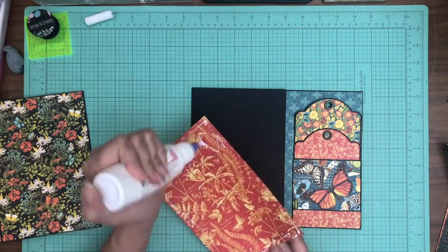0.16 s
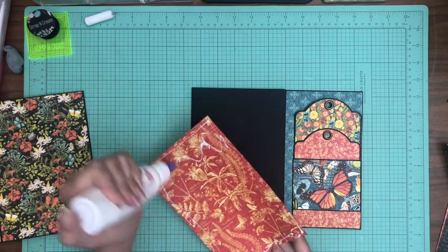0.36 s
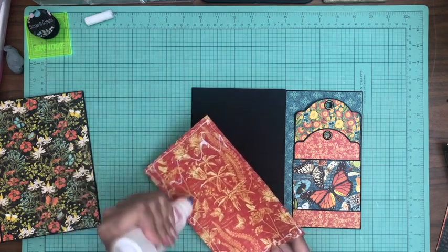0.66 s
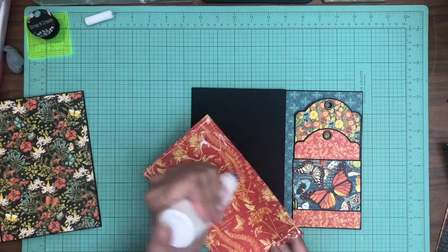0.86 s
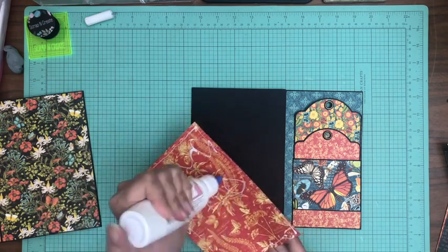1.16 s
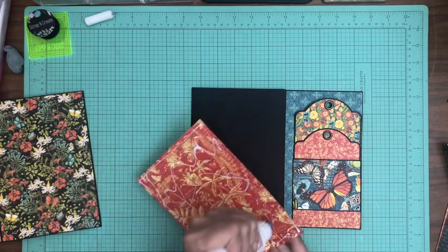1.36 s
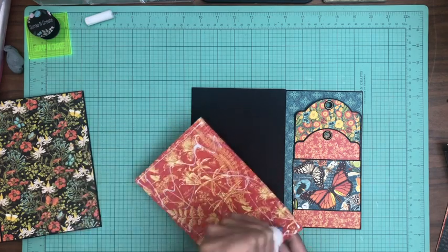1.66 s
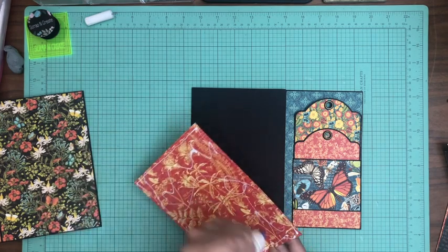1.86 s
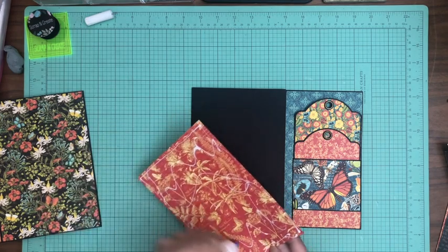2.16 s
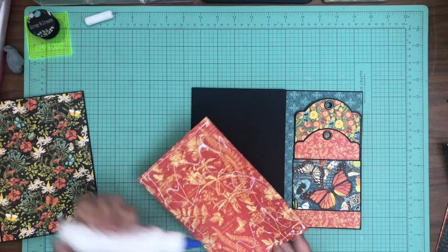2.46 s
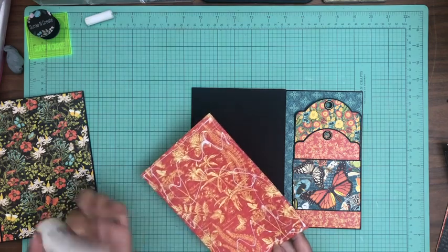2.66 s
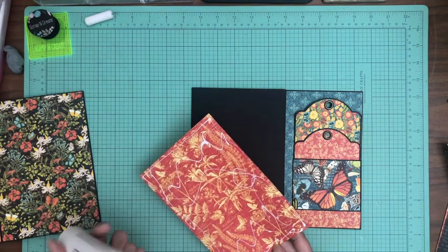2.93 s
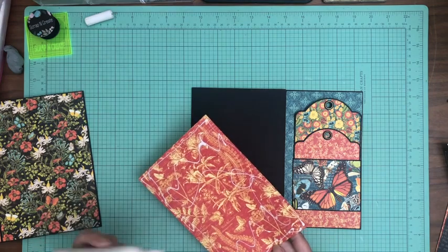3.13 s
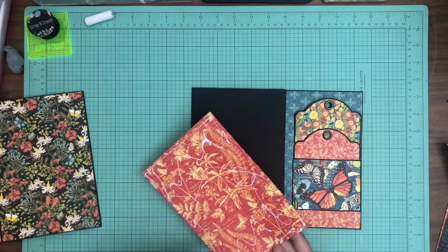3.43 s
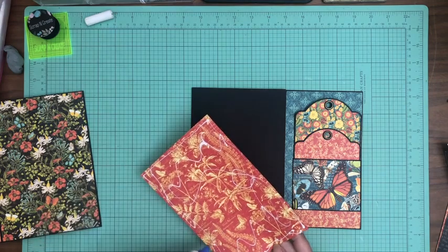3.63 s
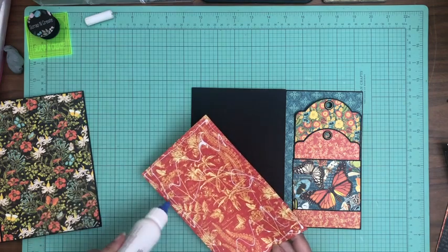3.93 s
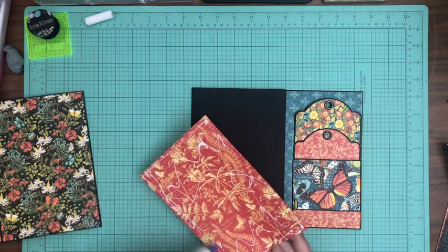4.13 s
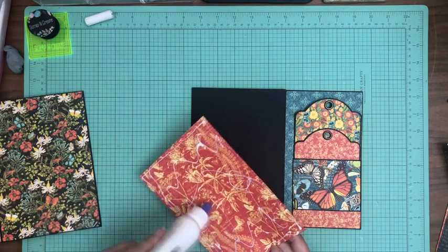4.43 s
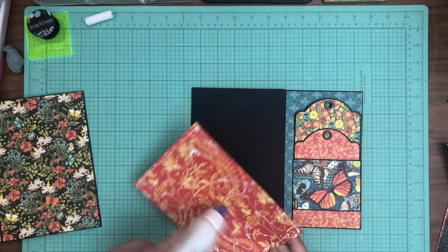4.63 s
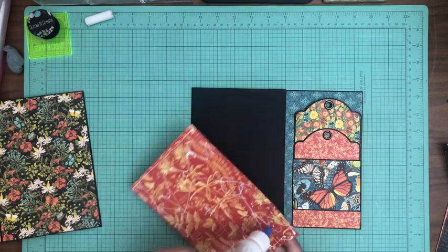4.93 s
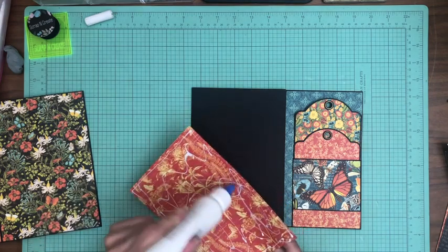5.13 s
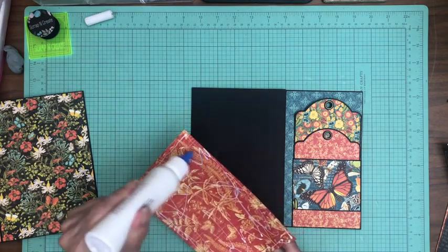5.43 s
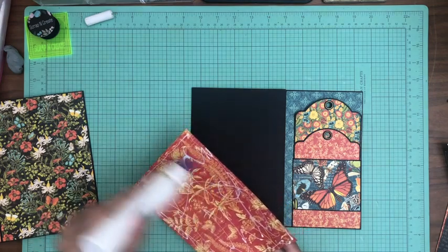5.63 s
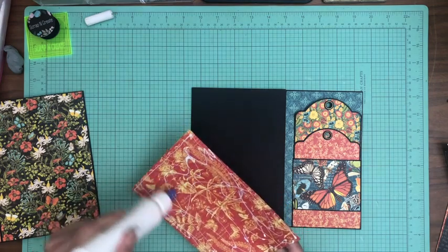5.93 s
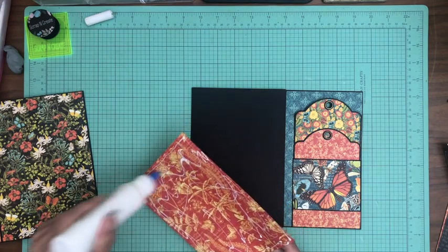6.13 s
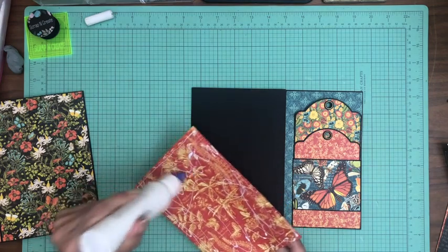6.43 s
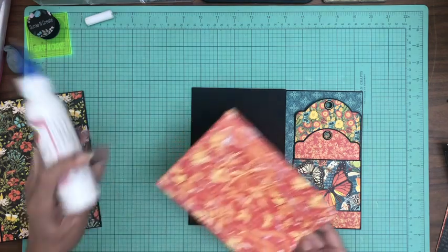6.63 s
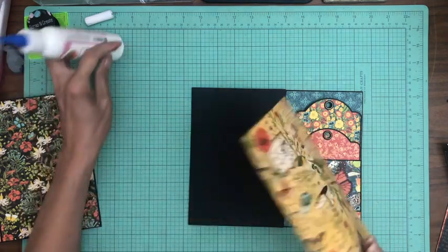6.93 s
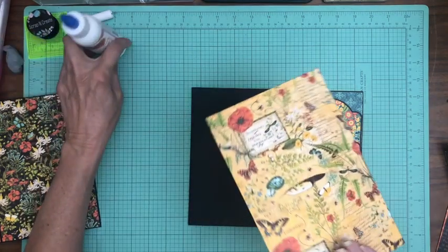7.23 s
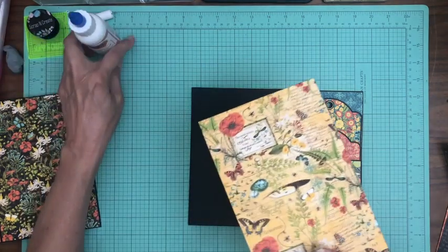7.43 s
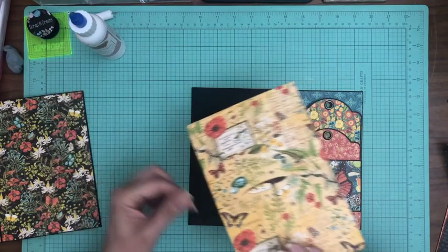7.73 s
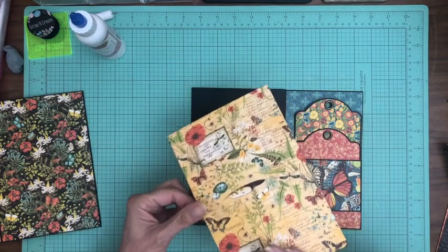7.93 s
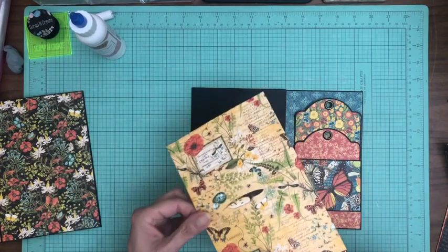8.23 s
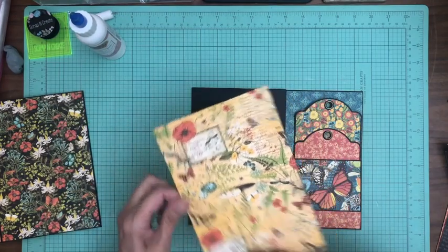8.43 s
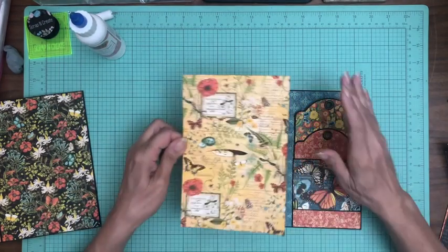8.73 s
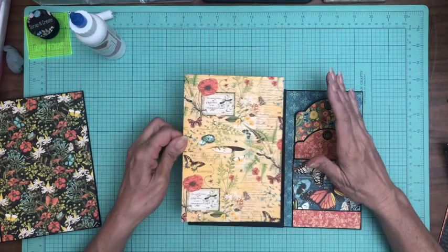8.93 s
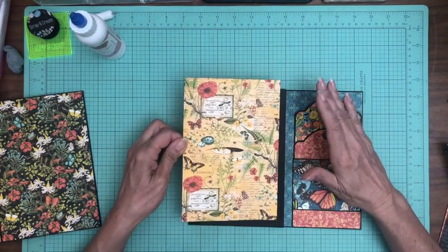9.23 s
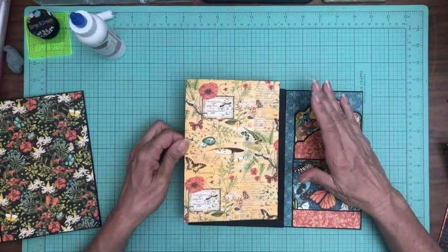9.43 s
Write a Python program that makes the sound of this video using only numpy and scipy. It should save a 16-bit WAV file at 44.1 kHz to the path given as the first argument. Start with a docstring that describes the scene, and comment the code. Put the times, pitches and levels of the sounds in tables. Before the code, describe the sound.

A plastic glue nozzle scribbles in quick raspy strokes over stiff paper, pauses, resumes, then a bottle thumps on the table and paper rustles.

```python
"""A plastic glue bottle nozzle scribbles back and forth over hand-held cardstock: noise bursts, one a stroke,
coloured by nozzle and sheet. The sheet pops (dying low modes); fibres and edges tick (short noise bursts).
The strokes pause for faint rustles, then resume. The bottle is then stood on the table with a thump (click,
table modes, rattle) and the sheet is turned over in the fingers, rustling and popping.
Throughout: a quiet room with a low appliance hum and thin whines, heard by a microphone overhead."""
import sys
import numpy as np
from scipy import signal
from scipy.fft import rfft, irfft
from scipy.io import wavfile
from scipy.ndimage import uniform_filter1d

SR = 44100
rng = np.random.default_rng(int(sys.argv[2]) if len(sys.argv) > 2 else 0)


def wav_out(sig):
    """Save sig, one row per channel (or a flat mono array), as 16-bit PCM at SR to the path in sys.argv[1]."""
    wavfile.write(sys.argv[1], SR, np.round(np.clip(np.atleast_2d(sig).T, -1, 1) * 32767).astype(np.int16))


N = 422478


def amp(db):
    """Decibels to gain."""
    return 10 ** (np.asarray(db) / 20)


def evened(x):
    """Scales to rms 1."""
    return x / np.sqrt(np.mean(np.abs(x) ** 2) + 1e-20)


def smoothed(x, first, second, axis=-1):
    """Two running means in a row."""
    return uniform_filter1d(uniform_filter1d(x, first, axis=axis), second, axis=axis)


def read(points, hz):
    """Looks up a spectrum on a log-frequency axis."""
    f, value = np.transpose(points)
    return np.interp(np.log(hz + 1), np.log(f + 1), value)


def along(curve, s, column=1):
    """Looks up a curve in time."""
    return np.interp(s, *np.transpose(curve)[[0, column]])


def peak(hz, centre_hz, width_hz):
    """Gain of one resonance, 1 at the top."""
    return 1 / np.sqrt(1 + (2 * (hz - centre_hz) / width_hz) ** 2)


def blend(*parts):
    """Power sum of (level dB, spectrum) parts, each spectrum first scaled to rms 1."""
    return np.sqrt(sum((amp(db) * evened(spectrum)) ** 2 for db, spectrum in parts))


def add(mix, s, sound):
    """Mixes a sound in from time s on."""
    at = round(s * SR)
    sound = sound[max(-at, 0):]
    part = mix[max(at, 0):][:len(sound)]
    part += sound[:len(part)]


def ring(hz, t60_s, seconds, rise_ms):
    """One dying mode with a soft start."""
    t = np.arange(round(seconds * SR)) / SR
    return amp(-60 * t / t60_s) * np.sin(2 * np.pi * hz * t) * (1 - np.exp(-1000 * t / rise_ms))


# Nozzle strokes. Each row: top speed at in seconds, rise in ms, fall in ms, sheet ring reference level in dB,
# brightness (hiss above the ring reference) in dB, sheet ring in Hz, nozzle ring in Hz.
STROKE_ROWS = [(0.031, 24, 31, -32, -8.5, 1470, 6050), (0.102, 16.4, 51, -35, -1, 1650, 4140),
               (0.221, 29.0, 32, -33, -6.5, 1310, 4170), (0.299, 26, 42, -32.5, -3.7, 1350.0, 4100),
               (0.347, 16, 48, -35.5, -5.5, 1490, 4300), (0.39, 4.9, 52.7, -32, -7, 1640, 4500),
               (0.472, 5.8, 123, -38, -7, 1550, 3260), (0.593, 19, 62.5, -30, -0.8, 1660, 4010.0),
               (0.738, 66, 28, -31, -8.5, 1460.0, 5750), (0.827, 53, 30, -31.5, -5.4, 1290, 4330),
               (0.84, 97.2, 115, -33.5, -16.5, 1270, 4260.0), (1.011, 25, 34.6, -32.5, -14, 1300, 6700),
               (1.087, 53, 43, -26, -17.5, 1340, 2900), (1.143, 39, 27, -32.0, -10.5, 1310.0, 4690.0),
               (1.238, 22, 104, -26, -8, 1430.0, 6650.0), (1.304, 70, 57, -32, 1.2, 1640, 6830.0),
               (1.433, 20, 49, -30.5, -1.0, 1370, 4400), (1.49, 42, 29.4, -28, -0.5, 1450.0, 4400.0),
               (1.58, 5.6, 41, -33, -2, 1500, 6100), (1.653, 69, 26.1, -30, 2.5, 1340, 6800),
               (1.719, 60, 34, -36.5, 0, 1380.0, 4970.0), (1.741, 20, 44, -26, -10.5, 1420, 4900),
               (1.826, 12, 24, -31.5, -12, 1280, 5650), (1.849, 15, 13, -31.5, 0, 1320, 5740),
               (1.94, 8, 63, -29.5, -7, 1400, 5400), (2.037, 7.6, 15.7, -31.5, -12, 1540, 3550.0),
               (2.076, 3.3, 36, -29, -12.5, 1400, 2860.0), (2.161, 28, 46, -30.0, -7, 1800, 3020),
               (2.252, 21, 12.7, -29.8, -18.5, 1470.0, 2710.0), (2.277, 22.4, 47, -29.5, -10, 1530, 3420),
               (2.357, 19, 39, -35.5, 6, 1650, 3170), (2.397, 36, 12, -29.5, -1, 1710, 3100),
               (2.417, 7.1, 57, -50, 5, 1660, 6400.0), (2.484, 6.3, 7.3, -48, -2, 2150.0, 2710.0),
               (2.558, 88.5, 14, -56, 3.5, 1540, 4840.0), (3.617, 6.4, 160, -50.5, -8.5, 1410.0, 5730),
               (3.793, 57, 23, -38, -12, 1480.0, 3330), (3.827, 3.8, 15, -33, -16, 1720, 2780),
               (3.866, 5.4, 65, -36.2, -12.5, 1610.0, 2820.0), (3.984, 5.8, 59, -44, -4.5, 1670.0, 2840.0),
               (4.015, 14, 8.4, -30.5, -4, 1650, 2910.0), (4.11, 2.0, 30, -48, -8, 1590.0, 2710.0),
               (4.179, 21, 57, -24.5, -8.1, 1860, 2750), (4.211, 3.8, 51, -41.5, -12.8, 1890.0, 2860.0),
               (4.27, 6.3, 65, -27.5, -13, 1970, 2980), (4.311, 31, 35, -28, -1, 2020, 6600),
               (4.386, 8.6, 66, -24, -14.5, 1550.0, 2870), (4.47, 5.0, 34, -35, -5, 1400.0, 4300.0),
               (4.487, 8, 8.5, -32, 4, 1420.0, 4240.0), (4.578, 11.4, 51, -29, -7, 1480, 4000),
               (4.61, 27, 22, -25.5, -8.5, 1430, 4060), (4.76, 3.6, 12.4, -23.0, -5.0, 1220, 3260.0),
               (4.793, 14.6, 11.5, -23.0, -8.5, 1140, 5900.0), (4.8, 29, 67, -35, -4, 1200.0, 5970),
               (4.873, 3.6, 7.3, -37, 17.5, 1490.0, 5740), (4.904, 5.0, 15.0, -44, 14, 1800.0, 7000.0),
               (4.931, 37, 14.4, -30.5, 5.5, 1820.0, 7000), (5.006, 33.0, 28, -33.5, 10, 1580, 5700),
               (5.05, 58, 26, -30.5, -10, 1290, 7750.0), (5.136, 37, 19, -37.5, -3.5, 1310, 5070),
               (5.205, 19, 68.5, -36, -4.5, 1670.0, 5470.0), (5.326, 5.5, 26, -38.5, -26, 1290, 7320.0),
               (5.43, 11, 20.4, -37.5, -12, 1250.0, 2800), (5.495, 12.3, 27, -32, -9, 1270, 5020.0),
               (5.517, 12.0, 40, -34, 7, 1470.0, 5060), (5.593, 11, 3.7, -32, -3.5, 1460, 5660.0),
               (5.63, 24.5, 35.4, -29.5, 1, 1390, 5370), (5.702, 24, 13, -37, -12, 1230, 3190.0),
               (5.74, 7.6, 18.4, -33, 7.5, 1900.0, 3200), (5.803, 30.4, 29, -33.5, 1.6, 1380, 8500),
               (5.837, 10.4, 41, -35.5, 6, 1410.0, 3920.0), (5.924, 26, 21, -35.2, 5, 1870.0, 6650),
               (5.95, 38, 32.6, -30.2, -8.5, 1920.0, 6700), (6.043, 25.5, 7.1, -27.5, -1.2, 1520, 4850),
               (6.077, 27, 28, -35, 3.5, 1840, 4830), (6.173, 36, 43, -31.5, 5, 1700, 7800),
               (6.264, 19, 5.1, -32.5, 4.7, 1360.0, 5920.0), (6.28, 8.5, 22, -34.5, -2.5, 1290, 5960.0),
               (6.359, 24.5, 10.7, -31, 3, 1320, 7600), (6.396, 14.3, 18.2, -25.0, -6.0, 1190, 3830.0),
               (6.436, 12, 49, -37, 0, 1360.0, 7400), (6.456, 4, 23, -38.5, 11.5, 1540.0, 7470.0)]


def stroke(row):
    """One nozzle stroke: fine grit, hard snags, pitch sinking at low speed."""
    return rub(row, grit_db=1.0, bumpy_db=0.73, ring_width_hz=700, ripple_db=3.06,
               modes_db=-1, sag=.18, snag=5.7)


# Fingers and cloth brushing paper and bottle. Each row: as for the nozzle strokes.
RUSTLE_ROWS = [(2.689, 2.0, 130, -70, 13.5, 1310.0, 6420.0), (2.696, 6, 8, -69, 15, 1300, 6400),
               (2.902, 12.9, 13, -53, 7.5, 1930.0, 5170.0), (3.034, 79, 31.1, -60.5, 3.7, 1440.0, 3980.0),
               (3.177, 73, 24.5, -57.1, -2, 1390.0, 6140.0), (6.587, 95, 36, -49.3, 1, 1610.0, 4200.0),
               (6.704, 77, 27, -53.5, 6.5, 1600.0, 7100), (6.797, 56, 66, -54, 6.5, 1870, 6330.0),
               (6.872, 2.5, 40, -56.5, 6.5, 1900, 3900), (7.256, 28.1, 89, -58, -2, 1280.0, 7060.0),
               (7.327, 9.4, 4.0, -60, 4, 1320.0, 7840.0), (7.681, 20, 19.4, -45.5, -28, 2100, 2710.0),
               (7.733, 6.6, 31, -49.5, -12, 1710.0, 3950), (7.942, 48, 13, -46, -10, 1530, 3510.0),
               (7.974, 2.0, 26, -56, -4, 1330.0, 4480.0), (8.144, 61, 42.6, -51.5, 1.5, 1530, 5810.0),
               (8.249, 18, 28, -42, -4.5, 1700, 6200), (8.312, 27, 23, -38, -4.5, 1650, 6100),
               (8.412, 4.9, 19, -39.5, -3, 1510, 6200), (8.42, 68, 51, -43.5, -0.5, 1510, 6100),
               (8.438, 11, 6.6, -34, -2, 1580, 6100), (8.559, 11, 7.9, -49.5, -9, 1750, 5300),
               (8.799, 2.4, 50, -53, -2.5, 1240.0, 7450.0)]


def rustle(row):
    """One brush of fingers or cloth: coarser grit, weaker snags, hardly any sinking."""
    return rub(row, grit_db=3.5, bumpy_db=1.5, ring_width_hz=700, ripple_db=0.1,
               modes_db=-6, sag=0.0292, snag=1.4)


# Spectrum shapes of slow waves in the sheet, scratch, hiss, fizz. Each row: Hz, relative level in dB per Hz.
BENDING_SHAPE = [(90, -41), (250, -10.5), (500, 4), (800, 2.5), (1100, -1), (2000, -27)]
SCRATCH_SHAPE = [(1500, -35.5), (2400, 2), (3500, 3.5), (5500, -1.5), (8000, -18)]
HISS_SHAPE = [(3500, -14.5), (5500, 2), (7000, 2), (10000, -1.5), (13000, -23)]
FIZZ_SHAPE = [(8000, -35), (10500, 0.5), (13000, 1), (16000, -3.5), (17000, -40)]
# Modes of the held sheet. Each row: centre in Hz, width in Hz, relative level in dB.
SHEET_MODES = [(1250, 200, 1), (1650, 350, -5), (2050, 400, -7)]
# Bending waves under a loud stroke, as the grip tightens and slackens. Each row: time in seconds, level in dB.
GRIP_SLACK = [(0, -44.5), (.6, -46), (.8, -40), (1.4, -51), (1.75, -51), (2.1, -47), (2.6, -48), (3.8, -44),
              (4.6, -48), (4.79, -32.5), (4.87, -58), (5.1, -43), (5.4, -36), (5.75, -44.5), (6.3, -36),
              (6.45, -45), (6.6, -46.5), (7.3, -54), (7.75, -54), (7.9, -35.5), (8.2, -42.5), (8.8, -40)]
# Drifting colour of the rubbing. Each row: time in seconds, scratch above its share in dB, fizz above hiss in dB.
RUB_COLOUR = [(0, -1, -8), (.2, 4.5, -11), (.6, 1.5, -10), (1, -3.5, -12), (1.4, -2, -8.5),
              (2.2, 2.5, -9.5), (2.5, -1.5, -2.5), (2.9, -4, 2), (3.2, 0, -9), (4.2, 5, -7), (4.5, -2, -10),
              (4.9, -3, -5), (5.3, -0.5, -8), (5.5, 0.5, -8.5), (5.9, 2.5, -11), (6.3, -1, -11),
              (6.9, -1, -7), (7.3, -3, -8), (7.7, 12, -20), (7.97, 1, -2), (8.15, -3.5, -13), (8.8, 1, -15)]
BENDING_SHARE, LOUD_DB = .4, -30  # bending follows the ring level by this share, counted from LOUD_DB
SCRATCH_SHARE = 0.75  # scratch follows the brightness by this share
RING_POWER, SCRATCH_POWER = 0.74, 0.81  # gain = speed to this power: sheet rings at speeds too low to hiss
SNAGS_PER_S = 450


def slip_noise(size, grit_db, snag):
    """Two trains of fibre slips, for contact and body; hard snags of fibres join the first."""
    grit = amp(grit_db * np.minimum(rng.exponential(1, size), 3))
    slips = evened(rng.standard_normal((2, size)) * grit)
    snags = snag * np.sign(slips[0]) * (rng.random(size) < SNAGS_PER_S / SR)
    return np.array([evened(slips[0] + snags), slips[1]])


def rub(row, grit_db, bumpy_db, ring_width_hz, ripple_db, modes_db, sag, snag):
    """One sweep: a dense train of fibre slips, swelling with speed, heard through the sheet."""
    s, rise_ms, fall_ms, ring_db, bright_db, ring_hz, nozzle_hz = row
    hiss_db = ring_db + bright_db
    scratch_db = ring_db + SCRATCH_SHARE * bright_db + along(RUB_COLOUR, s)
    fizz_db = hiss_db + along(RUB_COLOUR, s, column=2)
    bending_db = along(GRIP_SLACK, s) + BENDING_SHARE * (ring_db - LOUD_DB)

    size = 2 ** 15
    middle = size // 2
    at = np.arange(size) - middle
    hz = np.fft.rfftfreq(size, 1 / SR)
    slope_ms = np.where(at < 0, max(rise_ms, .5), max(fall_ms, 1))
    speed = np.exp(-(at * 1000 / SR / slope_ms) ** 2)
    slips = slip_noise(size, grit_db, snag)
    bumps = evened(smoothed(rng.standard_normal(size), 60, 40))  # uneven paper surface

    # the many small modes of the sheet change with the spot that is touched
    ripple = evened(smoothed(rng.standard_normal(len(hz)), 150, 100))
    ripple = amp(ripple_db * ripple - ripple_db ** 2 / 9)
    nozzle = 1 + 1.6 * peak(hz, nozzle_hz, 520) ** 2
    modes = sum(amp(db) * peak(hz, f, width) ** 2 for f, width, db in SHEET_MODES)
    gains = [
        blend((ring_db - 4.0, peak(hz, ring_hz, ring_width_hz) ** 2)),
        blend((scratch_db, nozzle * amp(read(SCRATCH_SHAPE, hz)))),
        blend((ring_db + modes_db, modes), (bending_db, amp(read(BENDING_SHAPE, hz)))),
        blend((hiss_db, nozzle * amp(read(HISS_SHAPE, hz))), (fizz_db, amp(read(FIZZ_SHAPE, hz)))),
    ]
    contact, body = rfft(slips)
    spectra = np.array([contact, contact, body, body]) * gains * ripple
    ringing, scratch, sheet, hiss = irfft(spectra, size)

    # the contact sound sinks in pitch where the nozzle or hand is slow
    clock = np.cumsum(1 - sag * (1 - speed))
    clock -= clock[middle]
    ringing = np.interp(clock, at, ringing)
    scratch = np.interp(clock, at, scratch)
    sweep = (ringing + sheet) * speed ** RING_POWER
    sweep += scratch * speed ** SCRATCH_POWER
    sweep += hiss * speed
    return s - middle / SR, sweep * evened(amp(bumpy_db * bumps))


def shifting(x, patchy_db):
    """The small modes that sound change as the contact point travels: drifting patches of colour."""
    z = signal.stft(x, nperseg=512, noverlap=448)[2]
    patches = smoothed(rng.standard_normal(z.shape), 3, 4, axis=0)  # over frequency
    patches = smoothed(patches, 9, 14, axis=1)  # over time
    gain = amp(patchy_db * evened(patches) - patchy_db ** 2 / 9)
    return signal.istft(z * gain, nperseg=512, noverlap=448)[1][:N]


# Dull pops of the flexing sheet. Each row: start in seconds, peak in dB, pitch in Hz.
FLAP_ROWS = [(2.305, -29.5, 278), (4.755, -25.5, 255.6), (4.783, -24.5, 301), (5.245, -33.5, 300),
             (5.437, -26.5, 594), (6.385, -21, 268), (6.396, -19.5, 507), (7.942, -28, 597),
             (8.437, -29.5, 316), (8.463, -34, 340), (8.599, -32, 290), (8.615, -37, 330),
             (8.804, -30.5, 494), (8.806, -31, 135)]
FLAP_T60_S = 0.11  # at the pitch itself; higher modes die sooner


def flap(s, db, hz):
    """The sheet flexes: a few loose low modes, swelling over some milliseconds."""
    ratios = np.array([.88, .96, 1.05, 1.18, 1.45, 1.9]) * rng.uniform(0.91, 1.05, 6)
    modes = 0
    for k in ratios:
        mode = ring(hz * k, FLAP_T60_S / np.sqrt(k), seconds=.3, rise_ms=3.0)
        modes = modes + mode * rng.choice([-1, 1]) / np.sqrt(k)
    return s, amp(db) * modes / np.abs(modes).max()


# Single fibres or edges catching. Each row: start in seconds, peak in dB, pitch in Hz.
TICK_ROWS = [(1.0096, -40, 1840), (1.576, -16, 1490), (1.931, -28, 1680), (2.074, -20, 1600),
             (2.3747, -16, 3130), (2.483, -27, 2490), (3.863, -30, 1610), (4.109, -34, 2020),
             (4.401, -20, 1690), (4.5484, -25, 1576), (4.757, -15.5, 3220), (5.7346, -17, 3120),
             (6.837, -32, 4560), (6.8738, -30, 3930), (6.981, -41, 9000), (7.066, -39, 10500),
             (7.0868, -35.5, 5900), (7.823, -37, 1363), (7.868, -39, 1970), (7.935, -26, 1700),
             (8.4064, -22.5, 1480)]
TICK_RISE_MS, TICK_DECAY_MS = 0.23, 2.3


def tick(s, db, hz):
    """A fibre or edge catches: a short burst of noise, coloured round one pitch."""
    t_ms = np.arange(1024) * 1000 / SR
    f = np.fft.rfftfreq(1024, 1 / SR)
    colour = (peak(f, hz, 0.38 * hz) ** 2 + 0.042) * f / (f + 1200)
    burst = irfft(rfft(rng.standard_normal(1024)) * colour)
    burst *= np.exp(-t_ms / TICK_DECAY_MS) * np.minimum(t_ms / TICK_RISE_MS, 1)
    return s, amp(db) * burst / np.abs(burst).max()


# Bottle set down. One row: table reference level in dB, rim click in dB, rattle before its low-pass in dB.
THUMP_LEVELS = (-20, -25, -38)
# Table top modes; the first two start opposed and beat.
# Each row: Hz, level above the table reference in dB, t60 in s, rise in ms, delay in ms, polarity.
TABLE_MODES = [(94, -.5, .29, 3, 0, -1), (108, -.5, .27, 3, 0, 1), (62, -14, .4, 6, 0, 1),
               (160, -9, .2, 2.5, 2.4, 1), (205, -8, .17, 1.5, 2.4, 1), (265, -8, .17, 1.5, 2.6, 1),
               (350, -1.5, .1, .8, 3.8, 1), (430, -11, .2, 1.5, 2.6, 1), (560, -13, .15, .8, 1.5, 1),
               (680, -11, .07, .8, 1.5, -1), (830, -14, .07, .8, .8, -1), (1297, -12, .04, .4, .4, 1)]
THUMP_S = 6.9952


def thump(table_db, click_db, rattle_db):
    """The rim clicks, the table top booms, loose things on it rattle briefly."""
    t = np.arange(SR // 2) / SR
    out = amp(click_db) * rng.standard_normal(len(t)) * np.exp(-t / 0.00083)
    dull_noise = signal.lfilter([1], [1, -.93], rng.standard_normal(len(t)))
    out += amp(rattle_db) * dull_noise * np.exp(-t / 0.022)
    for hz, db, t60_s, rise_ms, delay_ms, sign in TABLE_MODES:
        mode = ring(hz, t60_s, .5, rise_ms)
        add(out, delay_ms / 1000, sign * amp(table_db + db) * mode)
    return THUMP_S, out


def room(x, t60_s, wet_db):
    """Sparse reflections of random sign, duller as they die."""
    taps = np.zeros(SR // 2)
    at = np.arange(120, len(taps) - 22, 22)
    taps[at + rng.integers(0, 22, len(at))] = rng.choice([-1., 1.], len(at))
    t = np.arange(len(taps)) / SR
    dull = signal.lfilter([.3], [1, -.7], taps)
    bright = taps - dull
    tail = dull * amp(-60 * t / t60_s) + bright * amp(-60 * t / (0.063 * t60_s))
    return x + amp(wet_db) * signal.fftconvolve(x, tail / np.linalg.norm(tail))[:N]


# Spectrum shape of room tone and microphone hiss. Each row: Hz, relative level in dB per Hz.
AIR_SHAPE = [(12, -44), (20, -19), (88, -1), (172, -7), (446, -9.5), (574, -13), (873, -15), (1330, -24),
             (2820, -27.5), (6360, -30), (7110, -32), (8180, -30.5), (8890, -31), (14700, -34),
             (16000, -33)]
# Its drift. Each row: time in seconds, level in dB rms.
AIR_LEVEL = [(0, -49.5), (2.6, -46), (3.5, -47.5), (6.6, -47), (7.6, -48), (9.58, -49)]


def air():
    """Room tone and microphone hiss: coloured noise whose level drifts."""
    hz = np.fft.rfftfreq(N, 1 / SR)
    noise = irfft(rfft(rng.standard_normal(N)) * amp(read(AIR_SHAPE, hz)), N)
    return evened(noise) * amp(along(AIR_LEVEL, np.arange(N) / SR))


# Low appliance hum. Each row: Hz, level in dB rms, wavering in Hz, steadiness (steady to wavering ratio).
HUM_TONES = [(40.3, -54, 1.4, 5.7), (82, -49, 1.4, 5.8), (136.2, -60, 5.5, 1.3), (201.4, -61, 2.5, 1.7)]
# Thin whines. Each row: as for the hum.
WHINE_TONES = [(1680, -81, 3, 1.2), (7000, -76.5, 14, 1.4), (8875, -73, 40, 1.2), (14170, -96, 20, 1.5)]


def tones(table):
    """Lasting tones whose pitch and strength waver: a steady part plus slow complex noise."""
    out, t = np.zeros(N), np.arange(N) / SR
    for hz, db, waver_hz, steady in table:
        span = max(round(SR / (4 * waver_hz)), 2)
        a, b = smoothed(rng.standard_normal((2, N)), span, span)
        waver = steady + evened(a + 1j * b)
        out += amp(db) * evened((waver * np.exp(2j * np.pi * hz * t)).real)
    return out


def scene():
    """All sources at the table, in the room."""
    near = np.zeros(N)
    for row in STROKE_ROWS:
        add(near, *stroke(row))
    for row in RUSTLE_ROWS:
        add(near, *rustle(row))
    near = shifting(near, patchy_db=1.9)
    for row in FLAP_ROWS:
        add(near, *flap(*row))
    for row in TICK_ROWS:
        add(near, *tick(*row))
    add(near, *thump(*THUMP_LEVELS))
    heard = room(near, t60_s=.35, wet_db=-18)
    return (heard + air() + tones(HUM_TONES) + tones(WHINE_TONES))[None]


BASS_CUT_HZ, EDGE_HZ = 33, 15900


def record(dry):
    """The microphone loses the deepest bass; then the band limit."""
    bass_cut = signal.butter(3, BASS_CUT_HZ, "high", fs=SR, output="sos")
    thinned = signal.sosfilt(bass_cut, dry)
    band_limit = signal.firwin(511, EDGE_HZ, window=("kaiser", 9), fs=SR)
    return signal.oaconvolve(thinned, band_limit[None], "same")


dry = scene()
out = record(dry)
wav_out(out)
```